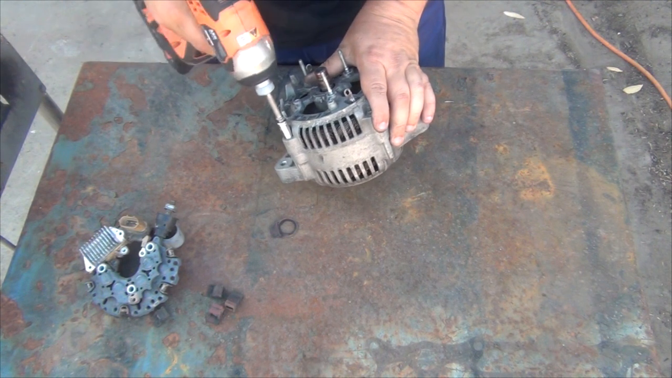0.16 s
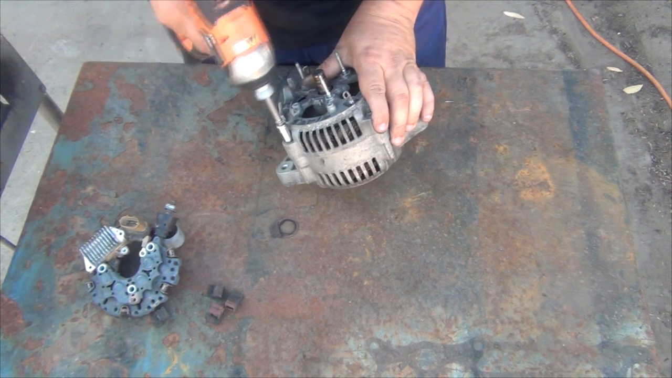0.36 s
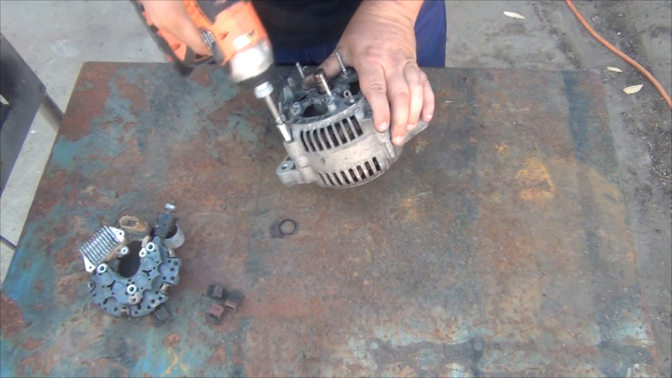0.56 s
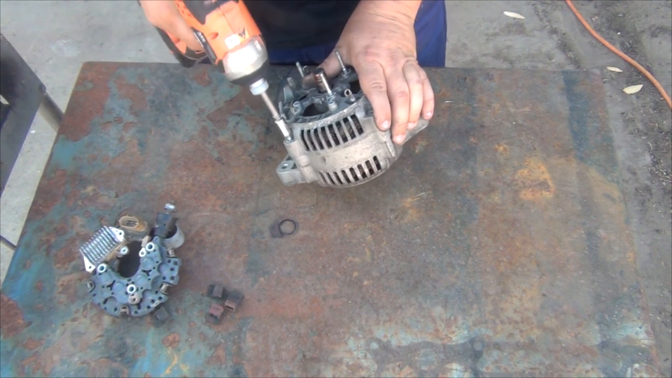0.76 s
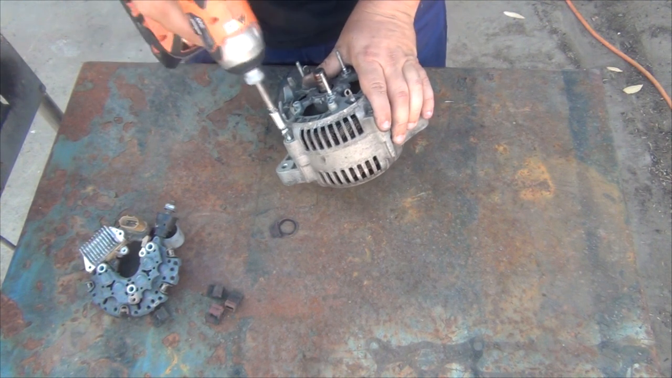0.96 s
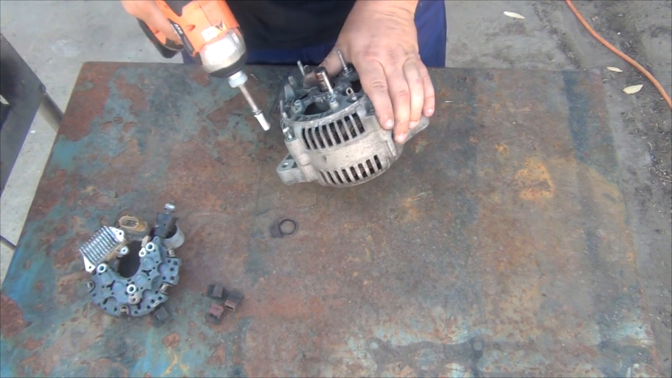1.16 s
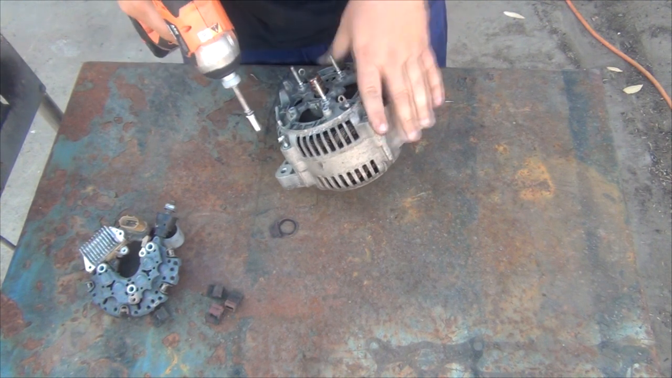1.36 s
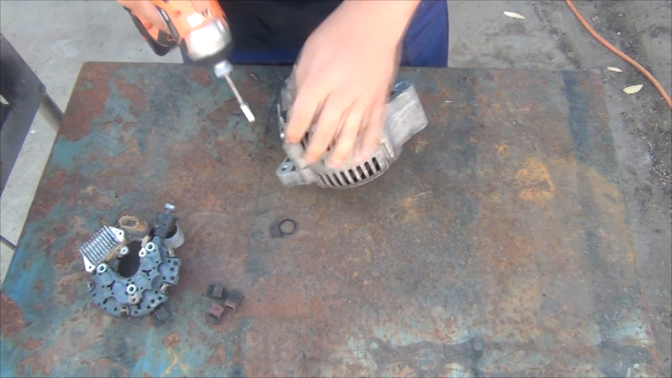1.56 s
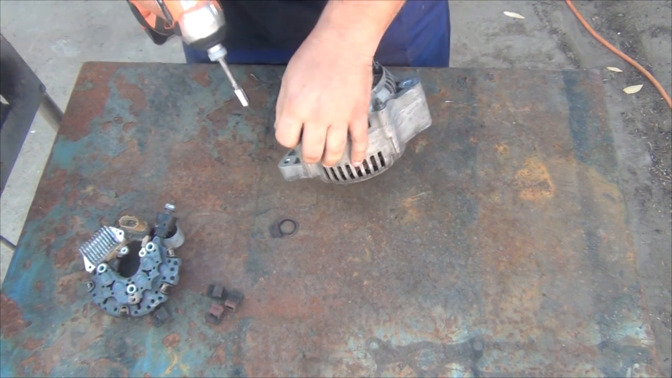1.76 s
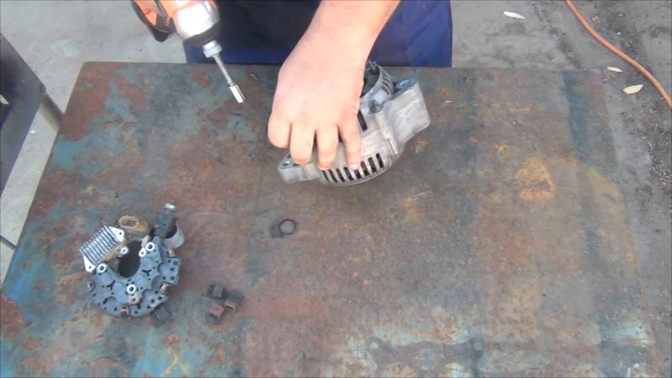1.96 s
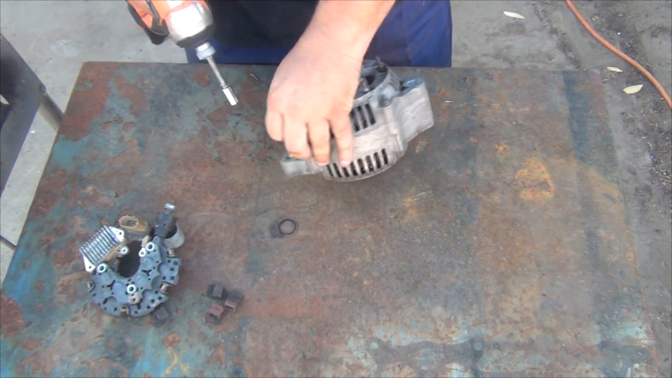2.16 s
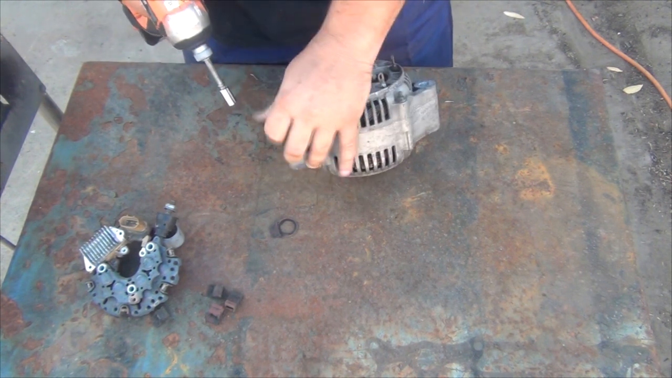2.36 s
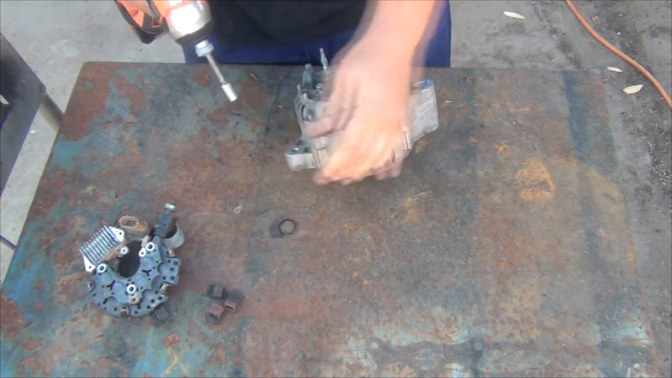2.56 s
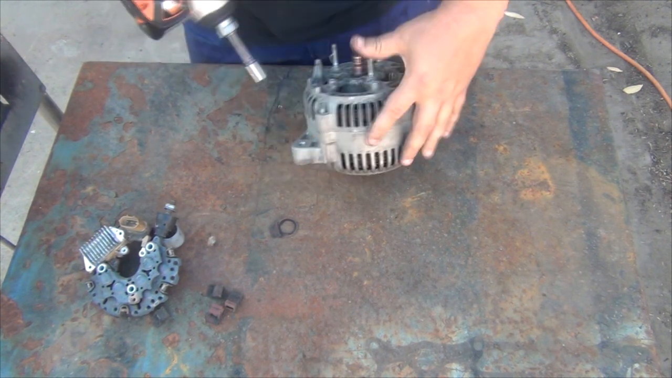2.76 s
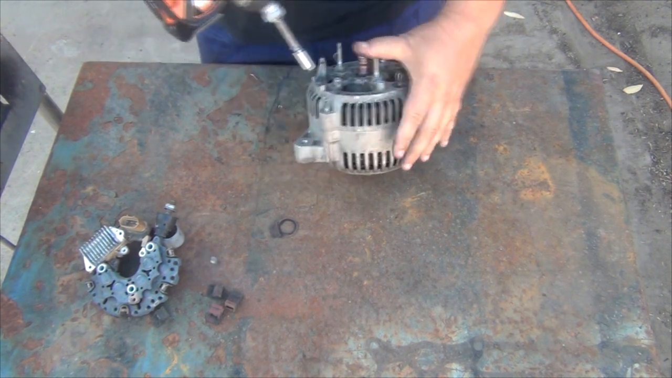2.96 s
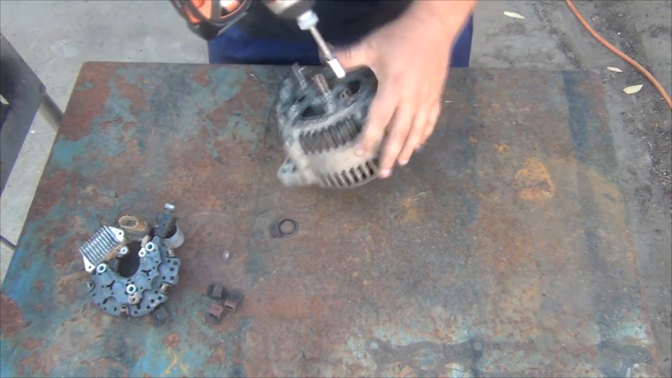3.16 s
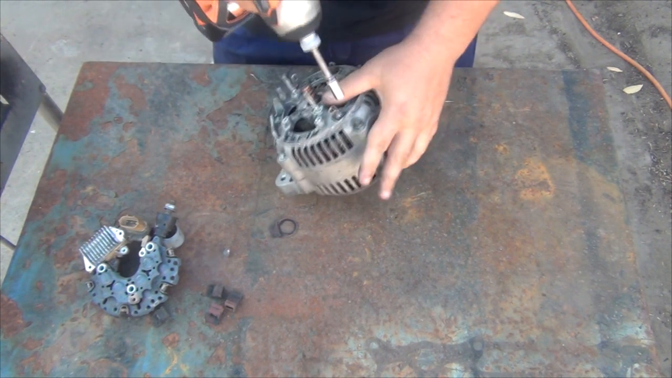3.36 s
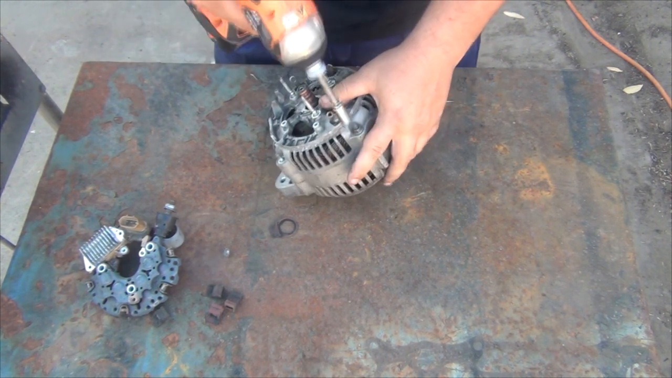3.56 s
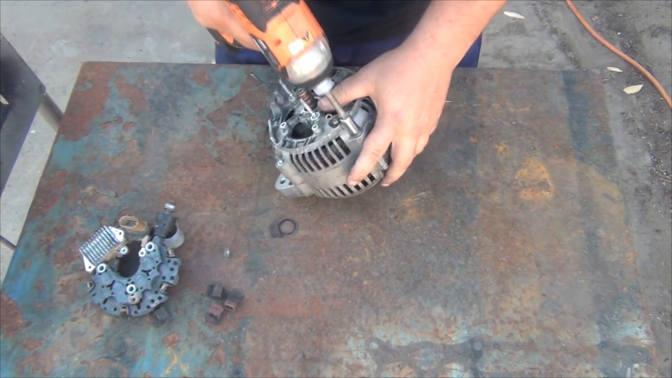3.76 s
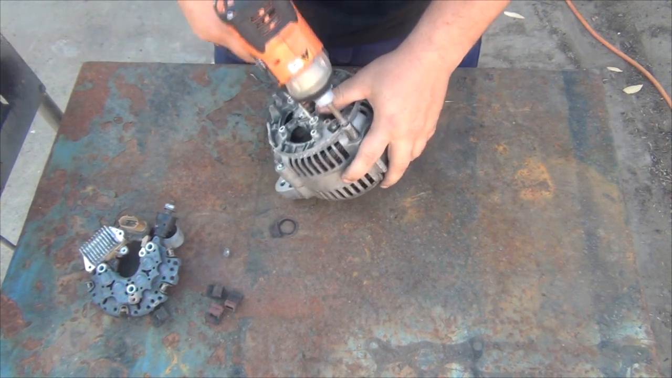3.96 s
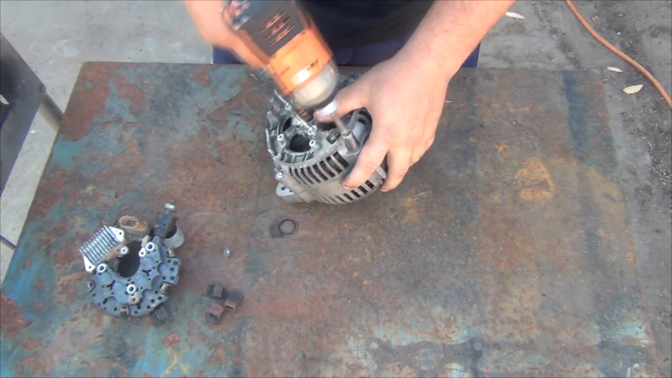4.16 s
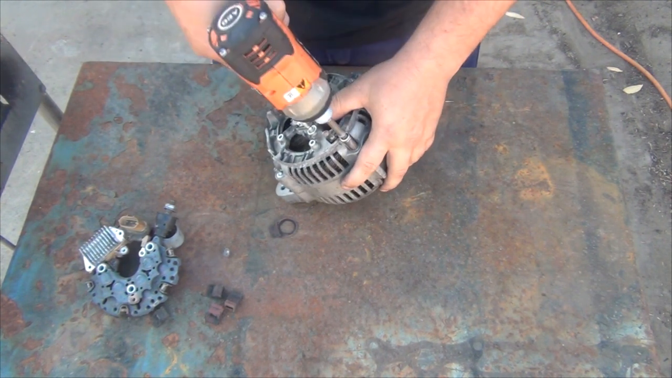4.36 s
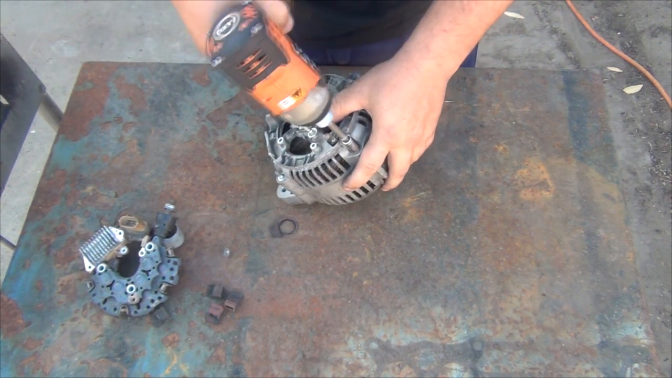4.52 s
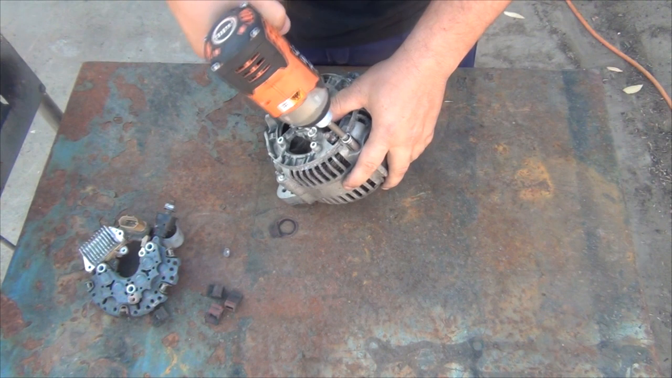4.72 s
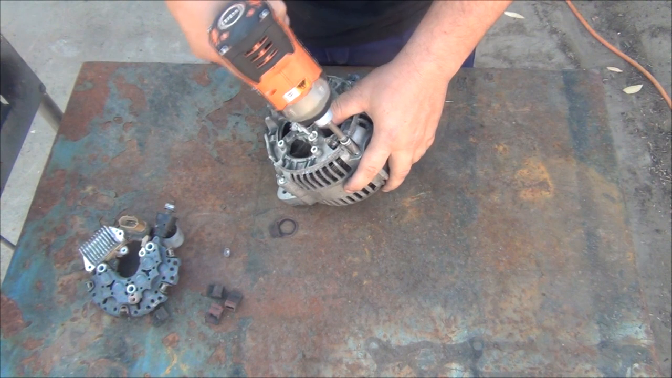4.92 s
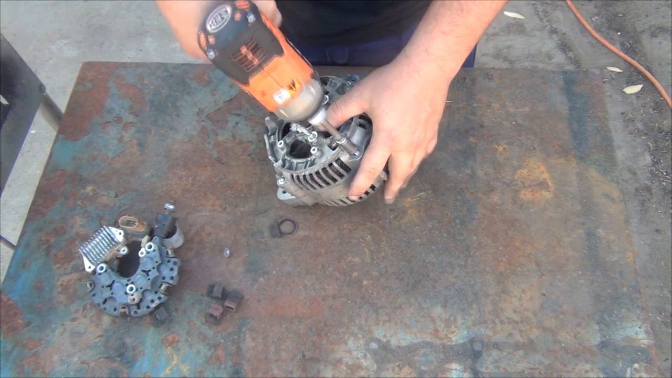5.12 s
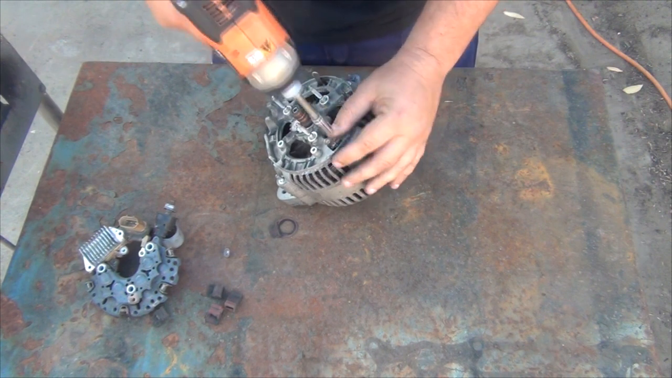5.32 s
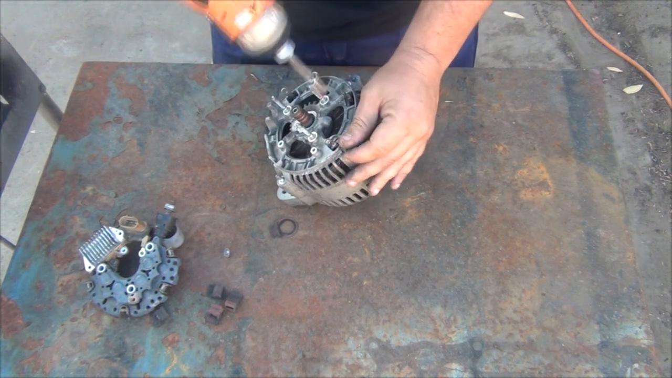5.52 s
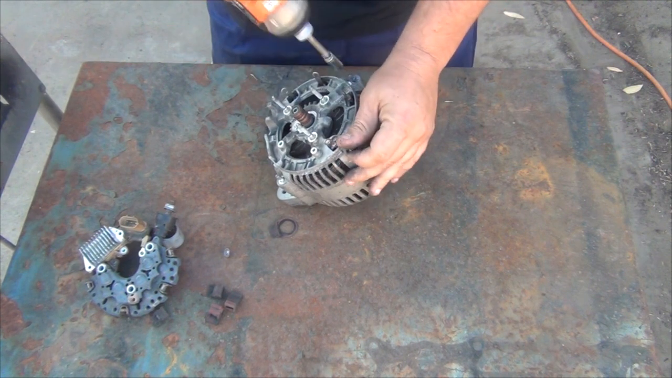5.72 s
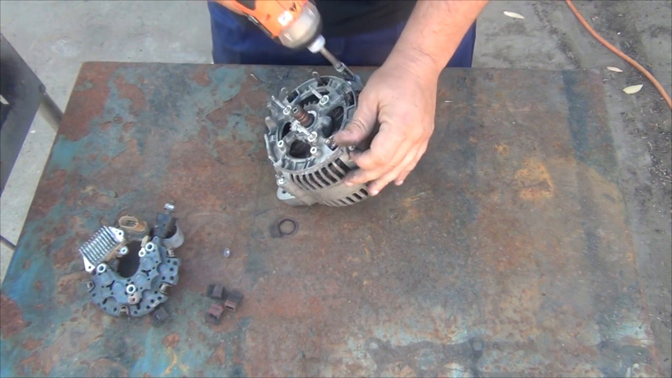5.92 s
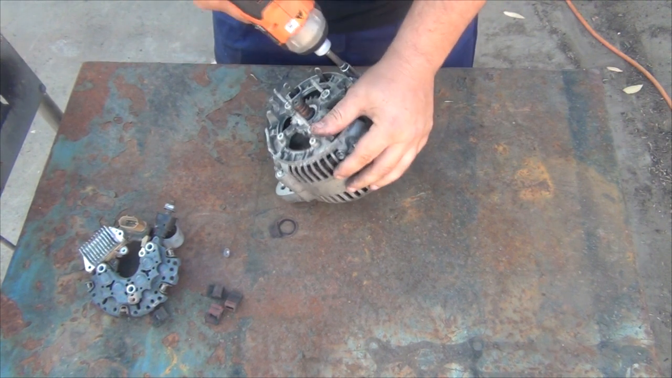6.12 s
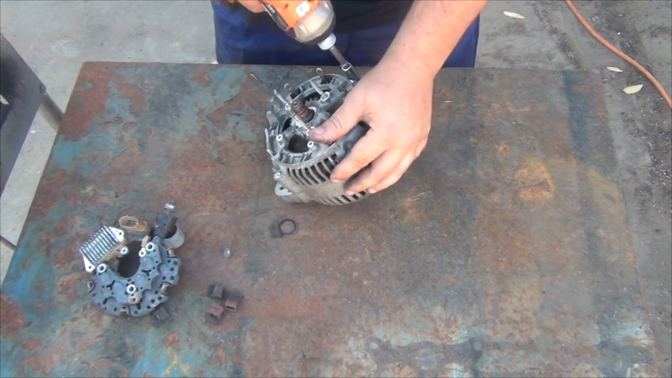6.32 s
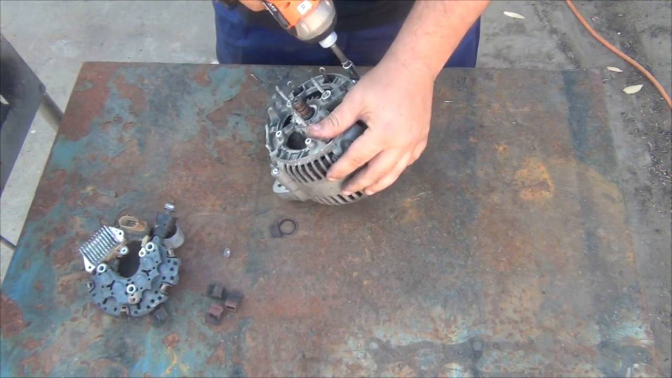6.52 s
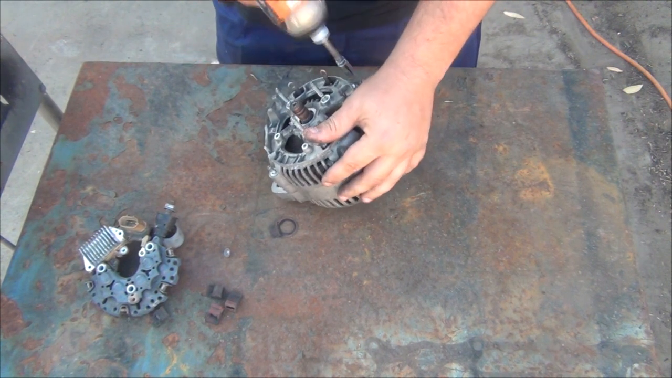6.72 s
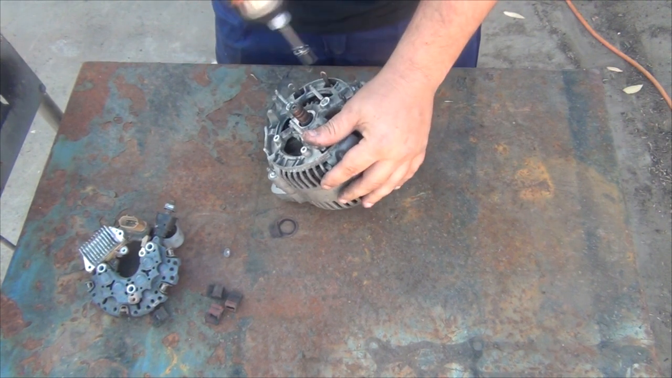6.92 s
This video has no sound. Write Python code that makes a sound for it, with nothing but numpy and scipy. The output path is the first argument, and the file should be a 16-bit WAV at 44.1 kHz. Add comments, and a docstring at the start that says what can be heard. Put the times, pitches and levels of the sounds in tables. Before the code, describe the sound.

Short chattering bursts of an impact driver loosen bolts, while a metal casting knocks and clinks on a steel bench outdoors.

```python
"""A cordless impact driver works the bolts of an alternator on a steel bench, over distant outdoor noise.
Light knocks lead into two short bursts: gear teeth rattle the housing, the socket chatters while the
bolt is tight, and in the second burst the gear mesh whines as it spins free. From 1.4 s the casting is
turned and knocked on the bench. Two bursts follow at 4.4 s, then more knocks, and a fifth at 6.2 s;
the last two end in the whine. A hard clank and a lighter one close the scene."""
import sys
import numpy as np
from scipy import signal
from scipy.fft import rfft, irfft, next_fast_len
from scipy.io import wavfile
from scipy.ndimage import uniform_filter1d

SR = 44100
rng = np.random.default_rng(int(sys.argv[2]) if len(sys.argv) > 2 else 0)


def to_wav(sig):
    """Store sig (one row per channel, or 1-D mono) as 16-bit WAV at the path in sys.argv[1].

    Samples outside -1..1 are clipped; the rate is SR.
    """
    pcm = np.clip(np.atleast_2d(sig), -1, 1) * 32767
    pcm = np.round(pcm).astype(np.int16)
    wavfile.write(sys.argv[1], SR, pcm.T)  # frames by channels


N = 312130
T = np.arange(N) / SR


def undb(db):
    """Decibels to gain."""
    return 10 ** (np.asarray(db) / 20)


def unit(x):
    """Scale to rms 1."""
    return x / np.sqrt(np.mean(x ** 2))


def noise():
    """White noise."""
    return rng.standard_normal(N)


def shape(x, points):
    """Minimum-phase filter whose gain follows (Hz, dB) points."""
    size = next_fast_len(N + 8192)
    hz, db = np.transpose(points)
    bin_hz = np.arange(size // 2 + 1) * SR / size
    log_gain = np.interp(np.log(bin_hz + 1), np.log(hz), db) * np.log(10) / 20
    cepstrum = irfft(log_gain, size)
    cepstrum[1:size // 2] *= 2
    cepstrum[size // 2:] = 0
    return irfft(rfft(x, size) * np.exp(rfft(cepstrum)), size)[:N]


def colour(x, points):
    """Shape, then scale to rms 1."""
    return unit(shape(x, points))


def band(x, lo_hz, hi_hz):
    """Band-pass, scaled to rms 1."""
    sos = signal.butter(2, [lo_hz, min(hi_hz, .45 * SR)], "band", fs=SR, output="sos")
    return unit(signal.sosfilt(sos, x))


def walk(per_s):
    """Random levels held 1 / per_s seconds and slewed twice; spread near 1."""
    hold = int(SR / per_s)
    steps = np.repeat(rng.standard_normal(N // hold + 1), hold)
    return 1.04 * uniform_filter1d(uniform_filter1d(steps, hold), hold)[:N]


def ring(x, modes, max_t60_s=.45):
    """Decaying modes struck by x, each t60 limited to between 10 ms and max_t60_s."""
    out = 0
    for hz, db, t60_s in modes:
        radius = np.exp(-np.log(1000) / (np.clip(t60_s, .01, max_t60_s) * SR))
        pole = radius * np.exp(2j * np.pi * hz / SR)
        out = out + undb(db) * np.sqrt(1 - radius) * signal.lfilter([1], [1, -pole], x).imag
    return 2 * out / np.sqrt(np.sum(undb(np.array(modes)[:, 1]) ** 2))


# Outdoor noise. Each row: time in seconds, relative hiss level in dB, rumble level in dB.
YARD_LEVELS = [(0, -34.5, -36.5), (.3, -33.5, -46), (1.08, -41.5, -55.5), (1.36, -42.5, -45.5),
               (1.97, -40.5, -55.5), (2.3, -37, -51), (2.7, -35.5, -61.5), (3.37, -34.5, -52),
               (3.77, -34.5, -51.5), (4.16, -34.5, -59), (5.4, -40.5, -59), (7.08, -39, -60.5)]
# Its two spectra. Each row: frequency in Hz, relative density in dB.
HISS_SPECTRUM = [(150, -62), (250, -24), (380, -0.5), (414, -9), (452, -2.5), (761, -4), (875, -2.5),
                 (971, -4), (1670, -7), (16000, -36)]
RUMBLE_SPECTRUM = [(15, -51), (25, -44), (66, -7.5), (124, -2), (156, -0.5), (260, -3.5), (350, -9.5),
                   (460, -57), (770, -120)]


def yard():
    """Distant hiss and a low, gusty rumble."""
    at_s, hiss_db, rumble_db = np.transpose(YARD_LEVELS)
    hiss = undb(np.interp(T, at_s, hiss_db) - 7.5 + 1.2 * walk(4.3)) * colour(noise(), HISS_SPECTRUM)
    rumble = undb(np.interp(T, at_s, rumble_db) + walk(7.4)) * colour(noise(), RUMBLE_SPECTRUM)
    return hiss + rumble


def ducking(near, knee_db=-24, slope=2.1, attack_s=.13, release_s=.0083):
    """Gain control: loud near sound slowly turns the distant noise down; it comes back fast."""
    def power(lag_s):
        keep = np.exp(-1 / (lag_s * SR))
        return signal.lfilter([1 - keep], [1, -keep], near ** 2)
    loud_db = 10 * np.log10(np.minimum(power(attack_s), power(release_s)) + 1e-12)
    return undb(-slope * np.maximum(loud_db - knee_db, 0))


# Steel bench top and alternator casting.
# Each row: mode frequency in Hz, relative level in dB, t60 in seconds before limiting.
BENCH_MODES = [(113.6, -0.5, 0.55), (228.5, 2, 0.53), (331, 8, 0.11), (466, 9.5, 0.028), (646, 8.5, 0.038),
               (803, 9, 0.049), (991, -6, 0.36)]
CASTING_MODES = [(630, -3, .4), (780, -2, .25), (1000, -2, .4), (1250, -4, .15), (1410, -1, .22),
                 (1590, -2, .2), (1750, -5, .15), (1905, 1, .22), (2110, -3, .15), (2490, 0, .22),
                 (2600, -4, .12), (2745, 2, .25), (3050, -4, .15), (3460, -7, .07), (3850, -8, .07),
                 (4200, -5, .1), (4390, -8, .07), (4930, -9, .07), (5290, -9, .08)]
# Knocks of casting, socket and bench. Each row: start in seconds, relative levels of clank, thud, body
# and tick in dB, clank frequency in Hz, clank t60 in ms.
CONTACTS = [(0.0281, -40, -37, -20.5, -70, 3240, 305), (.169, -32, -27, -52, -69, 3880, 99),
            (.2253, -32, -26.5, -50, -63, 4300, 56), (0.2453, -23, -55.5, -45, -41, 3350, 110),
            (.2664, -19, -33, -41, -28, 3530, 60), (0.4663, -6, -24, -23.5, -30.5, 4520, 41),
            (.59, -34, -48, -48, -50, 4000, 72), (.6, -21, -47, -36, -38, 3780, 150),
            (1.4257, -18.5, -36, -28.5, -41.5, 2360, 21), (1.696, -33, -50, -59, -70, 3750, 100),
            (2.1432, -18, -41, -54, -40.5, 3600, 90), (2.1994, -36, -48, -54, -53, 4020, 180),
            (2.3608, -25, -37, -35, -33.5, 4250, 124), (2.384, -18.5, -31, -29, -29.5, 4070, 110),
            (2.5548, -5, -53, -23.5, -12.5, 4200, 307), (2.6607, -7.5, -33, -25, -12.5, 4070, 192),
            (2.7153, -13.5, -41, -30, -41, 4160, 134), (2.7355, -25, -51, -39, -44, 4160, 220),
            (2.8584, -18, -39, -35, -41.5, 4130, 180), (2.9544, -27, -54, -42, -53, 4200, 110),
            (3.0807, -37, -34, -49, -62, 4050, 290), (3.1437, -44.5, -19.5, -28, -51, 4330, 210),
            (3.2432, -25.5, -42, -44.5, -41.5, 3700, 120), (3.2889, -34, -59, -59, -52, 3060, 96),
            (3.7439, -14.5, -19.5, -25.5, -36, 3300, 60), (3.831, -23, -54, -28.5, -44, 4200, 46),
            (3.8615, -17, -25, -33, -49, 3900, 56), (3.8928, -9.5, -40, -23.5, -22.5, 3870, 38),
            (3.8981, -24, -23.5, -48, -38, 3700, 180), (4.1086, -33, -37.5, -45, -61, 3730, 120),
            (4.209, -27.5, -50, -51, -53, 3500, 140), (4.2594, -31, -39, -48, -53, 4510, 120),
            (4.7496, -33, -29, -16.5, -40, 3350, 32), (5.3834, -58, -53, -53, -49.5, 3100, 240),
            (5.4973, -39.5, -56, -55, -47.5, 3800, 130), (5.8679, -11.5, -34, -29, -40, 3730, 66),
            (5.9165, -23.5, -32, -37.5, -50, 3330, 140), (5.9445, -19, -28, -32, -41, 3900, 32),
            (5.965, -32, -38, -56, -54, 4160, 172), (6.0053, -33, -43, -45, -57, 5180, 60),
            (6.0152, -26.5, -28.5, -38, -61, 3620, 108), (6.0274, -30, -40, -59, -51, 4060, 85),
            (6.0452, -25, -34, -50, -43, 3300, 49), (6.0554, -48, -40, -39, -35, 2800, 81),
            (6.1433, -29, -66, -48, -39, 3570, 97), (6.1634, -26, -53, -45, -44, 4090, 50),
            (6.9347, -4, -36, -24, -12.5, 4500, 188), (7.0665, -20, -57, -34.5, -33.5, 4420, 120)]


def knocks(ping_db=-20, ping_t60_s=.06):
    """Each contact snaps, rattles briefly and dies, treble first; the bench thuds, the casting rings."""
    tick_noise, body_noise = band(noise(), 5700, 12700), noise()
    thud_noise, clank_noise = band(noise(), 84, 1730), noise()
    direct, thuds, blows = np.zeros((3, N))
    for start_s, clank_db, thud_db, body_db, tick_db, hz, t60_ms in CONTACTS:
        first = int(start_s * SR)
        t = T[:min(SR // 3, N - first)]
        span = slice(first, first + len(t))
        # Longer knocks touch longer and snap less.
        contact_s = .043 * t60_ms / 1000
        snap = 1 + undb(16.5 - .15 * t60_ms) * np.exp(-t / .00098)
        age_t60s = np.maximum(t - contact_s, 0) * 1000 / t60_ms
        clank = undb(clank_db - 17.5) * snap * band(clank_noise[span], hz / 1.196, hz * 1.254)
        # A soft contact sounds lower.
        hardness = np.clip((clank_db - body_db) / 24, -1, .5)
        body_hz = 1350 * 2 ** (.84 * hardness)
        body = undb(body_db - 8.5) * band(body_noise[span], body_hz / 2.07, body_hz * 1.75)
        tick = undb(tick_db - 5.5 - 85 * age_t60s) * snap * tick_noise[span]
        ping = undb(clank_db + ping_db - 60 * t / ping_t60_s) * np.sin(2 * np.pi * hz * t)
        direct[span] += undb(-60 * age_t60s) * clank + tick + undb(2.5 - 33.5 * age_t60s) * body + ping
        thuds[span] += undb(thud_db - 19.5 - 59 * age_t60s) * thud_noise[span]
        # A held casting (soft or short contact) rings less.
        freedom = min(t60_ms / 250, 1) * undb(10 * min(hardness, 0))
        blows[span] += freedom * undb(1 - 75 * age_t60s) * (body + .2 * clank)
    return direct + ring(thuds, BENCH_MODES) + ring(blows, CASTING_MODES)


# Each row: start, freeing and stop times in seconds (a short pull stops before the bolt is free), grip
# from 0 to 1, rattle levels when tight, free and coasting in dB, bench levels at start and stop in dB.
TRIGGER_PULLS = [(0.2783, 0.439, 0.445, 0.72, -14, -22.5, -34, -39, -39.5),
                 (0.621, 0.69, 0.954, 0.45, -12.5, -17, -37, -41.5, -66),
                 (4.403, 4.636, 4.608, 0.68, -14, -19, -25, -43, -30.5),
                 (4.729, 4.849, 5.235, 0.7, -14.5, -15.5, -35.5, -40, -53.5),
                 (6.177, 6.345, 6.777, 0.63, -14.5, -16, -38.5, -39.5, -57)]


def pulls(rise_s=.011, freeing_s=.058, brake_s=.055, free_grip=.13, brake_grip=.65):
    """Each pull starts fast and stops; in the longer ones the bolt frees and the driver spins on."""
    stop_db_per_s, coast_db_per_s, bench_db_per_s = 796, 189, 293
    rows = np.array(TRIGGER_PULLS)
    current = rows[np.maximum(np.searchsorted(rows[:, 0] - rise_s, T) - 1, 0)].T
    start_s, free_s, stop_s, bolt_grip, tight_db, free_db, coast_db, bench_from_db, bench_to_db = current
    loose = np.clip((T - free_s) / freeing_s + .5, 0, 1)
    progress = np.clip((T - start_s) / (stop_s - start_s), 0, 1)
    brake = np.clip((T - stop_s) / brake_s + 1, 0, 1)
    rise_db = 40 * np.log10(np.clip((T - start_s) / rise_s + 1, 1e-4, 1))
    stopped_s = np.maximum(T - stop_s, 0)
    driven_db = tight_db + (free_db - tight_db) * loose - stop_db_per_s * stopped_s
    rattle_db = np.maximum(driven_db, coast_db - coast_db_per_s * stopped_s)
    bench_db = bench_from_db + (bench_to_db - bench_from_db) * progress - bench_db_per_s * stopped_s
    loose_grip = free_grip + (brake_grip - free_grip) * brake
    grip = bolt_grip + (loose_grip - bolt_grip) * loose
    return rattle_db + rise_db, bench_db + rise_db, grip


# Socket bites at set times, including each pull's first.
# Each row: start in seconds, peak above the rattle in dB.
SET_BITES = [(0.276, 4.5), (0.3049, 10.5), (.3574, 9), (0.3829, 6.5), (.44, 2.5), (0.621, 1.5), (.664, 5.5),
             (4.402, 4.5), (4.4256, 6.5), (4.4352, 8.5), (4.4427, 7.5), (4.476, 5), (4.497, 7), (4.5075, 7),
             (4.5214, 7.5), (4.547, 6), (4.559, 8.5), (4.567, 6), (4.588, 5), (4.6055, 1.5), (4.7287, 5),
             (4.738, 6.5), (4.7487, 8.5), (4.774, 6.5), (4.7908, 4.5), (6.1779, 3.5), (6.192, 8),
             (6.1992, 8.5), (6.214, 5.5), (6.2226, 10.5), (6.247, 6), (6.263, 9), (6.269, 7.5)]


def bites(median_gap_s=.0095, mean_db=6, spread_db=2):
    """Random bites fill in between the set ones while a bolt is tight: times in seconds, peaks in dB."""
    rows, set_s = list(SET_BITES), np.array(SET_BITES)[:, 0]
    for start_s, free_s, stop_s, *_ in TRIGGER_PULLS:
        gap_draw, level_draw = rng.standard_normal((60, 2)).T
        at_s = start_s + np.cumsum(median_gap_s * np.exp(.55 * gap_draw))
        clear = np.abs(at_s[:, None] - set_s).min(axis=1) > median_gap_s / 2
        keep = clear & (at_s < min(free_s, stop_s))
        rows += zip(at_s[keep], mean_db + spread_db * level_draw[keep])
    return np.transpose(sorted(rows))


def socket_chatter(grip, fall_db=26.5, crest_db=6, max_hold_s=.02):
    """Envelope of the socket: it bites, drags, and lets go before the next bite."""
    at_s, peak_db = bites()
    latest = np.maximum(np.searchsorted(at_s, T) - 1, 0)
    age_s = np.maximum(T - at_s[latest], 0)
    hold_s = np.minimum(np.diff(at_s, append=N / SR), max_hold_s)[latest]
    slip = (age_s / hold_s) ** 4
    bite_db = peak_db[latest] - crest_db - grip * fall_db * slip
    biting = (T >= at_s[0]) & (age_s <= hold_s)
    flicker_db = 1.12 * walk(150)
    push_db = 2.5 * grip * walk(35)  # the hand pushes unevenly
    return undb(np.where(biting, bite_db, 0) + flicker_db + push_db)


# Gear mesh, one table per free spin.
# Each row: time in seconds, mesh frequency in Hz, upper and lower tone levels in dB.
MESH_RUNS = [
    [(.63, 3250, -40, -50), (.655, 3450, -24, -45), (.68, 4050, -31, -40), (.71, 4530, -30, -35),
     (.746, 4834, -27, -30), (.782, 4997, -16.5, -23), (.868, 5110, -15.5, -30), (.905, 4970, -20, -22.5),
     (.925, 4504, -36, -35)],
    [(4.8, 4350, -47, -47), (4.848, 4476, -16.5, -43), (4.894, 4870, -13, -27), (4.925, 4920, -33, -21),
     (4.962, 5040, -20.5, -33), (5.14, 5110, -17.5, -37), (5.172, 4970, -18, -35), (5.198, 4000, -23, -42)],
    [(6.32, 4657, -42, -42), (6.348, 4680, -21, -19), (6.416, 4930, -24, -27.5), (6.54, 4946, -18.5, -28),
     (6.6, 5050, -17, -21), (6.68, 5110, -18, -29), (6.722, 5030, -19, -31), (6.755, 3235, -30, -36)],
]


def gear_whine(grip, tooth_ratio=.706, silent_db=-90):
    """Two gear meshes whine: bolt load smears the upper tone; the looser, lower mesh throbs."""
    rows = []
    for run in MESH_RUNS:
        (start_s, start_hz, *_), (end_s, end_hz, *_) = run[0], run[-1]
        rows += [(start_s - .004, start_hz, silent_db, silent_db), *run]
        rows += [(end_s + .03, end_hz, silent_db, silent_db)]
    at_s, *curves = np.transpose(rows)
    hz, upper_db, lower_db = [np.interp(T, at_s, curve) for curve in curves]
    phase = 2 * np.pi * np.cumsum(hz * (1 + .002 * walk(120))) / SR
    shaken = phase + 3.4 * grip * walk(400)
    upper = undb(upper_db + 2.1 * walk(200)) * (np.sin(shaken) + undb(-21.5) * np.sin(2 * shaken))
    lower = undb(lower_db + 6.2 * walk(280)) * np.sin(tooth_ratio * phase + 1.5 * walk(150))
    return np.sqrt(2) * (upper + lower)


# Housing under load and spinning free. Each row: frequency in Hz, relative density in dB.
LOADED_SPECTRUM = [(290, -42), (500, -20), (960, -6.5), (1080, -5.5), (1510, -5), (2650, -12.5),
                   (3060, -14), (3390, 7.5), (4210, -1.5), (4600, 2.5), (5970, -8.5), (7100, -5.5),
                   (8700, -9.5), (12500, -16), (16000, -22.5)]
FREE_SPECTRUM = [(290, -76), (500, -25), (1090, -15), (1440, -8.5), (2130, -7.5), (2690, -11.5),
                 (3540, -1.5), (4210, -5.5), (5090, -8.5), (5970, -12.5), (7000, -9.5), (8580, -18),
                 (9920, -14.5), (14900, -30), (16000, -41)]
# Driver shell. Each row: mode frequency in Hz, relative level in dB, t60 in seconds before limiting.
SHELL_MODES = [(1410, -4, 0.062), (1546, -4, 0.09), (2380, -16, 0.06), (3440, 12.5, 0.1), (3520, -4, 0.067),
               (4570, 8.5, 0.1), (5370, -8, 0.062), (7510, 0, 0.0093)]


def driver():
    """Tooth and socket clicks ring housing, shell, bench and casting while the gears whine."""
    rattle_db, bench_db, grip = pulls()
    chatter = socket_chatter(grip)
    clicks = unit(noise() * undb(2.7 * rng.exponential(size=N)))
    loaded = np.sqrt(grip) * colour(clicks, LOADED_SPECTRUM)
    whirr = undb(-1) * np.sqrt(1 - grip) * colour(noise(), FREE_SPECTRUM)
    housing = undb(rattle_db + .88) * chatter * (loaded + whirr)
    shell = ring(undb(rattle_db - 11) * chatter * clicks, SHELL_MODES, max_t60_s=.075)
    bench = ring(undb(bench_db) * chatter * band(noise(), 180, 2700), BENCH_MODES)
    dull_clicks = colour(clicks, [(300, -18), (700, -4.5), (1600, 2), (3000, -6.5), (16000, -44)])
    casting = ring(undb(rattle_db - 18) * grip * chatter * dull_clicks, CASTING_MODES, max_t60_s=.096)
    return housing + shell + bench + casting + gear_whine(grip)


# Stereo side signal of near and distant sounds. Each row: frequency in Hz, gain in dB.
NEAR_SIDE = [(60, -19), (200, -27), (700, -29.5), (2000, -30), (4500, -18.5), (9000, -20), (15000, -16)]
YARD_SIDE = [(40, -18), (150, -12.5), (500, -18), (2000, -8.5), (6000, -9.5), (10000, -12.5), (15000, -18)]


def scene(right_db=-.25):
    """Narrow stereo: a weak, shifting reflection and part of the distant noise give the width."""
    low_cut = signal.butter(4, 85, "high", fs=SR, output="sos")  # cut deep bass from the near sounds
    near = signal.sosfilt(low_cut, driver() + knocks())
    duck = ducking(near)
    mid = near + duck * yard()
    smear = rng.standard_normal(900) * np.exp(-np.arange(900) / 250)
    smear /= np.sqrt(np.sum(smear ** 2))
    reflection = walk(17) * signal.fftconvolve(near, smear)[:N]
    side = shape(reflection, NEAR_SIDE) + duck * shape(yard(), YARD_SIDE)
    return np.array([mid + side, undb(right_db) * (mid - side)])


def record(dry, top_hz=16100):
    """Round the loudest peaks, then low-pass twice."""
    rounded = .8 * np.tanh(dry / .8)
    low_pass = signal.ellip(10, .1, 60, top_hz, fs=SR, output="sos")
    return signal.sosfilt(low_pass, signal.sosfilt(low_pass, rounded))


dry = scene()
out = record(dry)
to_wav(out)
```